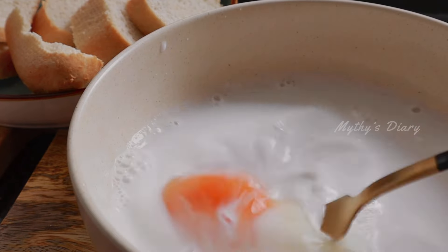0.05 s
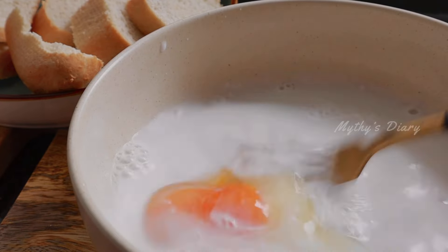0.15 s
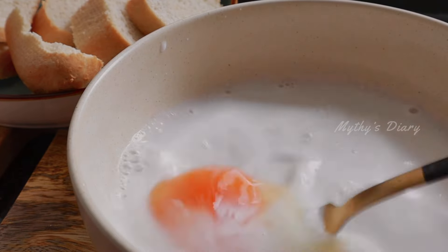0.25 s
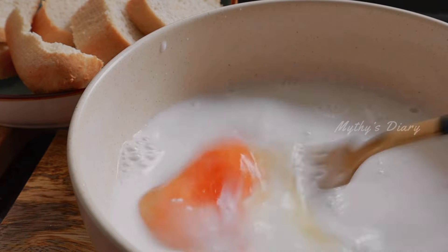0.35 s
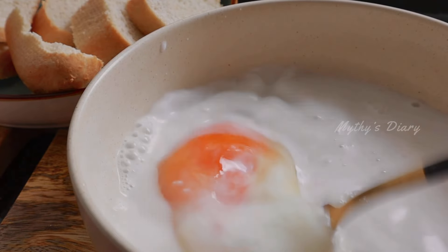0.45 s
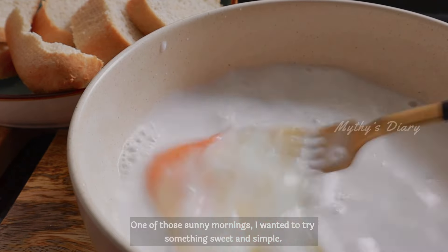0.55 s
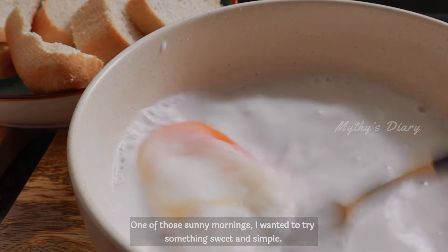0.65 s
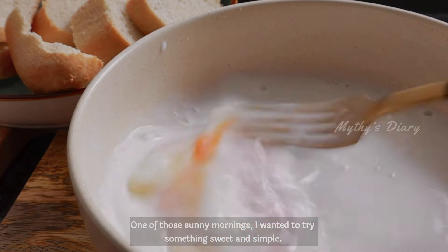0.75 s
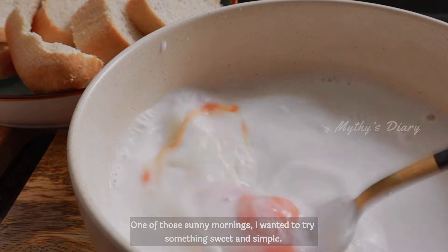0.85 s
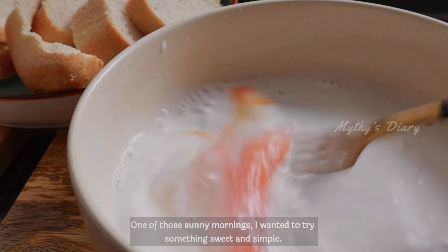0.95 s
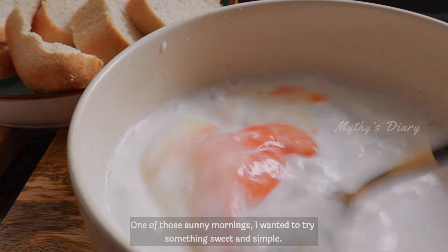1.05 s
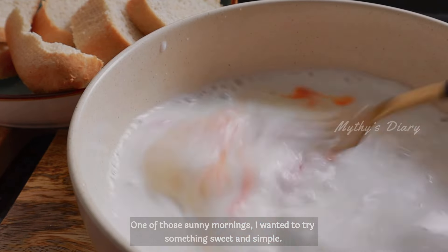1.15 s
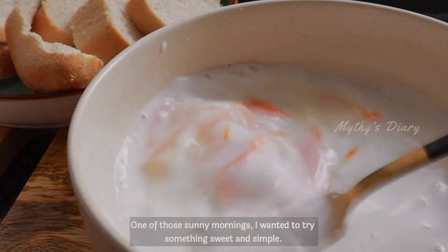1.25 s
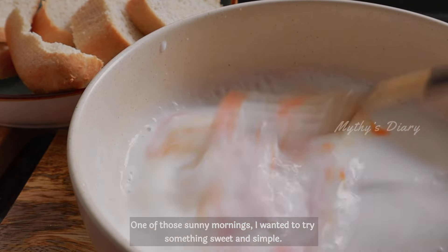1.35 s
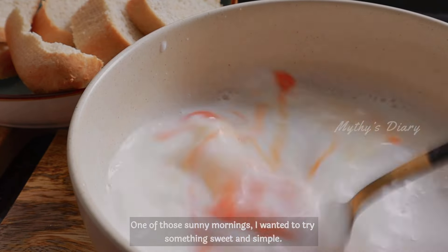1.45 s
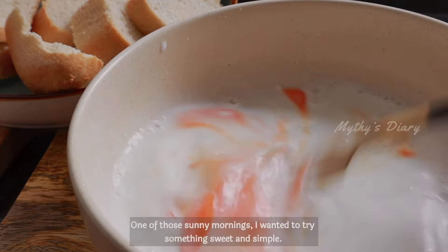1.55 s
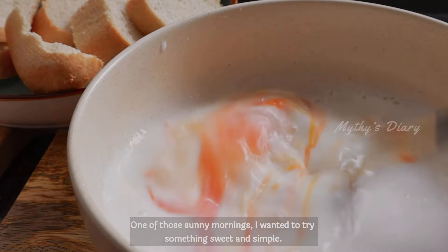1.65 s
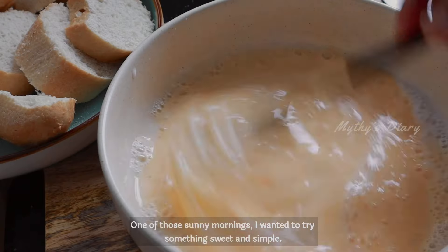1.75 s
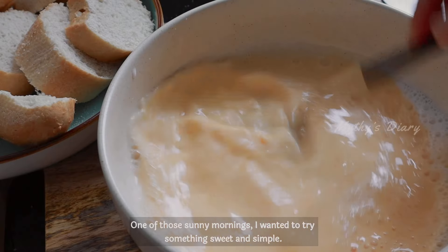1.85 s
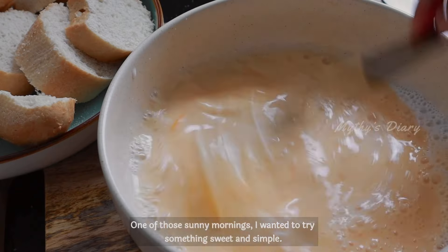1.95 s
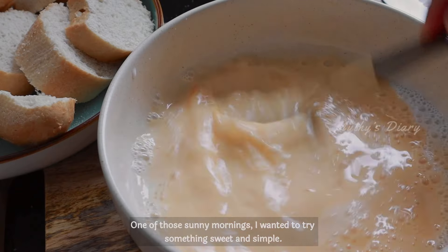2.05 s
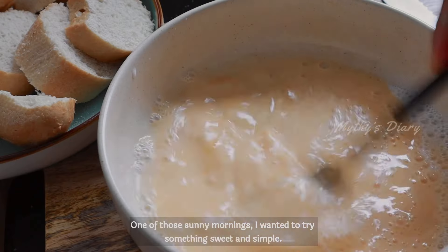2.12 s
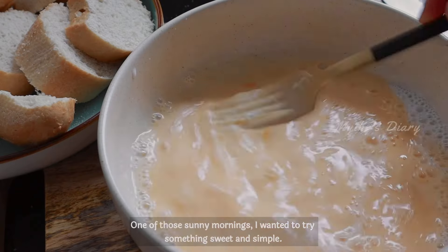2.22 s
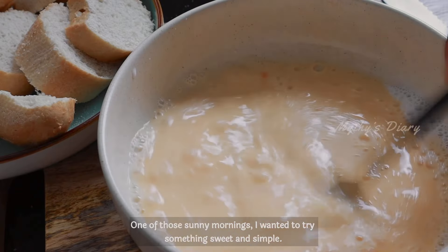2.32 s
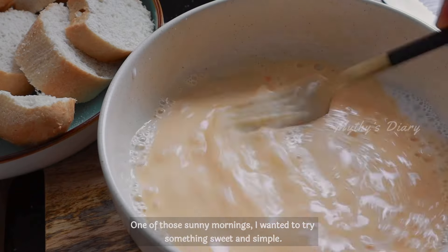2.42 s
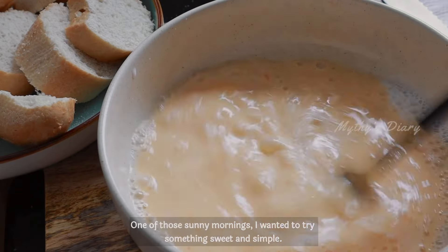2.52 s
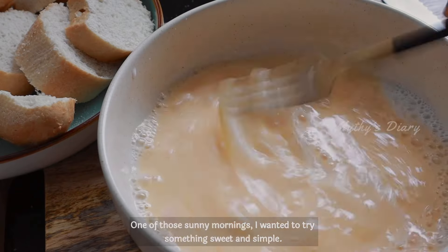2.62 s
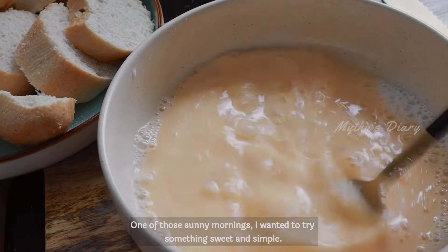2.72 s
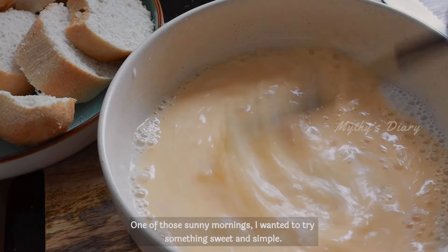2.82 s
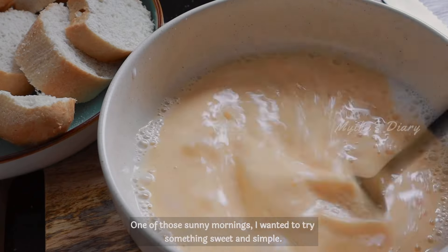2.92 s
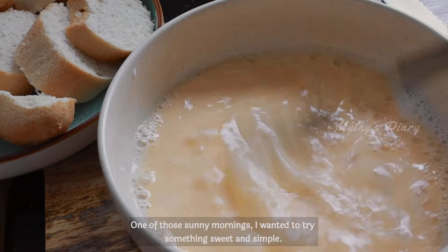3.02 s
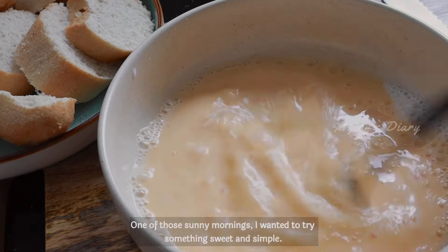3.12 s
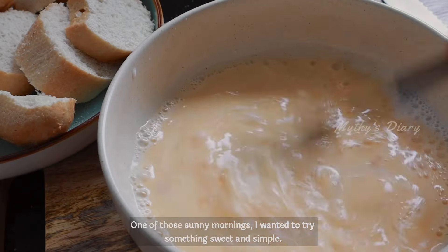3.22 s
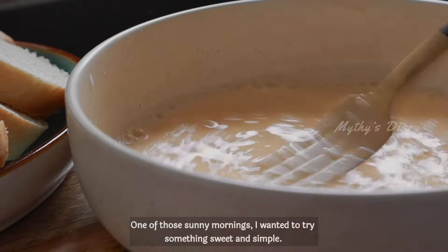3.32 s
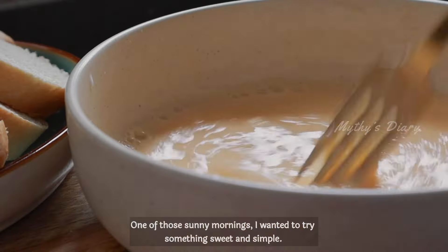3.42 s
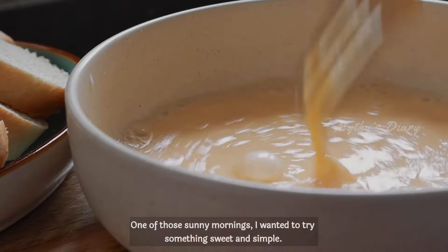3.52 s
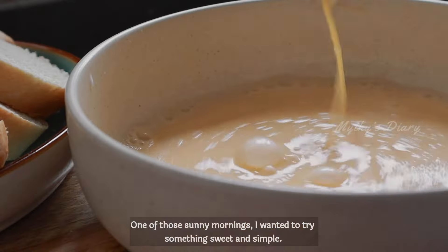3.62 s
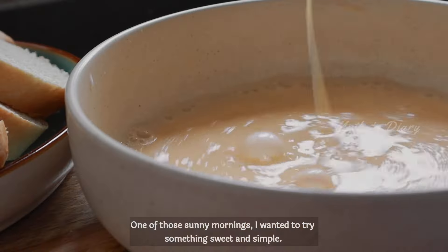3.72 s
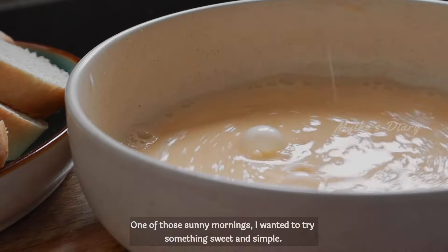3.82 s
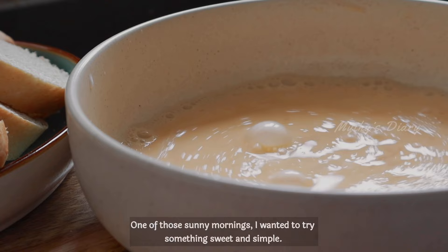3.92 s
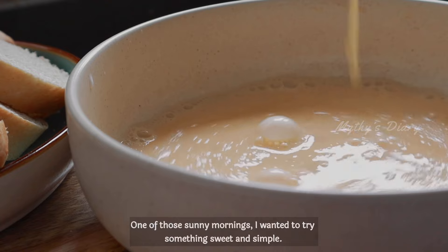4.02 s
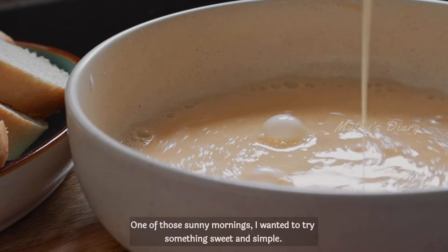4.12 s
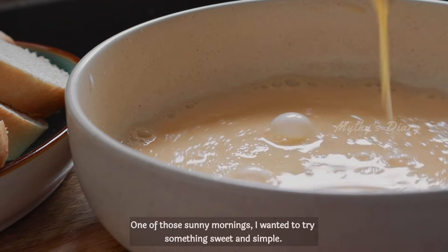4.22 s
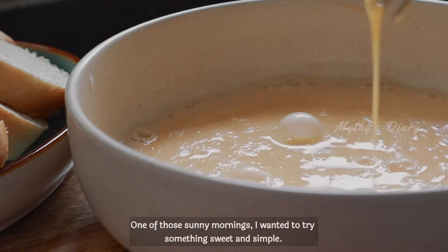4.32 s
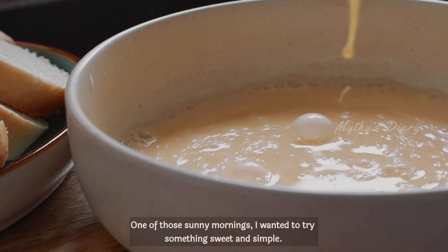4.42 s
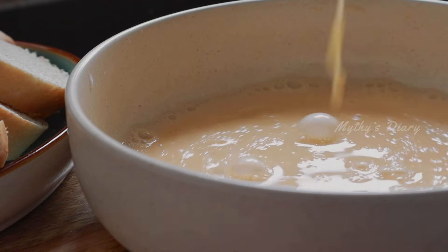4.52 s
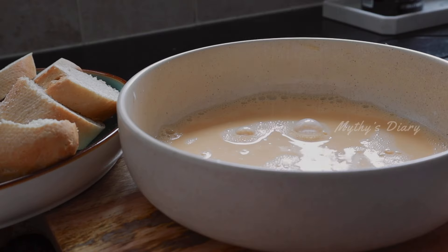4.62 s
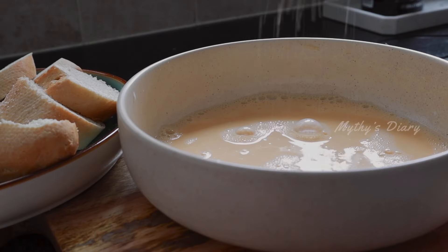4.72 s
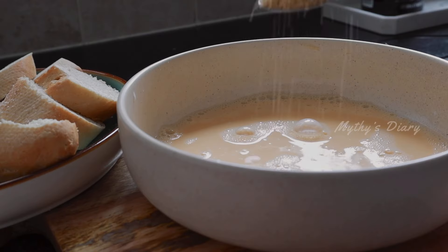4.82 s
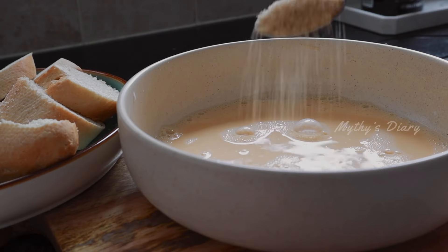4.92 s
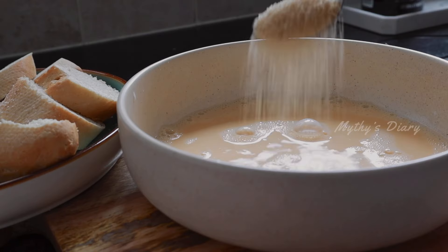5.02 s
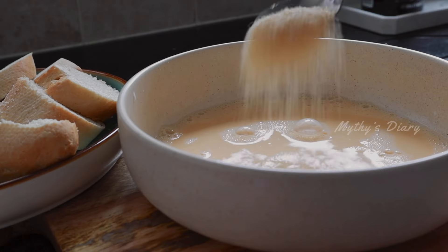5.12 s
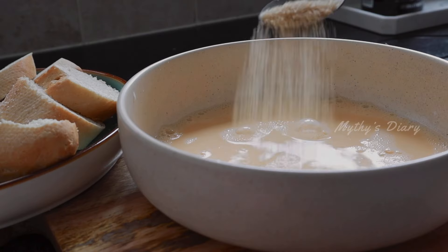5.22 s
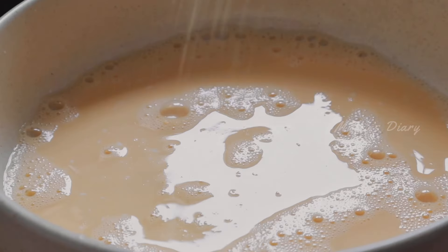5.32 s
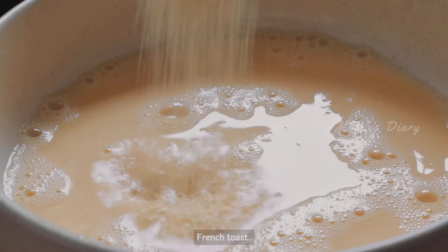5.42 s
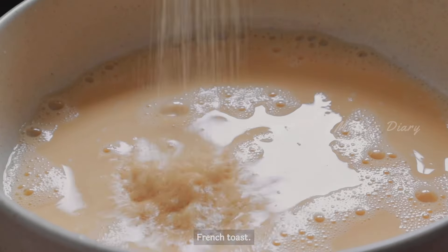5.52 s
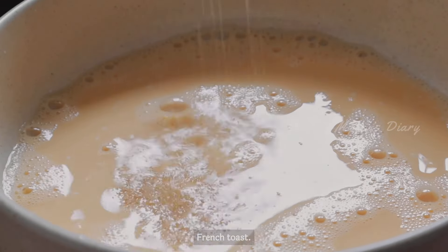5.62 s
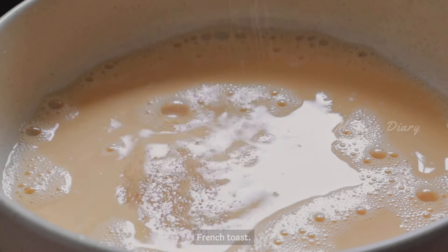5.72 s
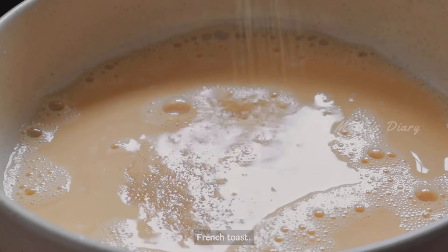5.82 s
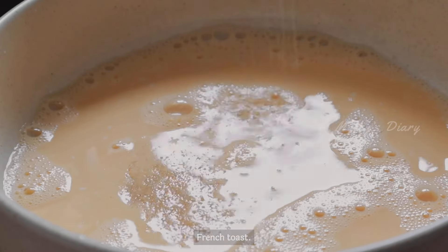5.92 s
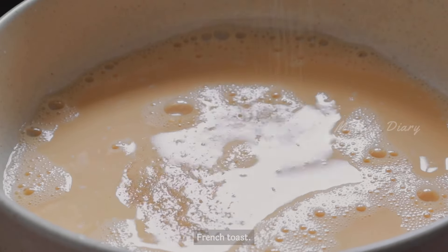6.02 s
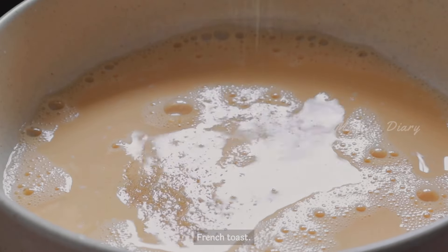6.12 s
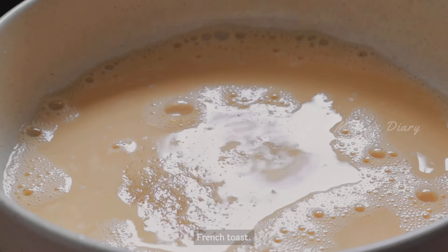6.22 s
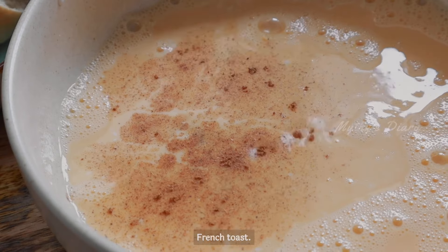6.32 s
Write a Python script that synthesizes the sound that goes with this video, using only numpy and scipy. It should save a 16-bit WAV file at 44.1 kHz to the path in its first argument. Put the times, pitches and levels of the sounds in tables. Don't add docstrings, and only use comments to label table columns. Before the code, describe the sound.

Close to the microphone in a small kitchen, a metal fork beats egg and milk in a ceramic bowl. Soft, uneven strokes become steady, louder clinks with short scrapes, tiny squeaks, gulps and droplets, the bowl thudding on its board. A light rim tap and two faint distant knocks follow in near quiet, then sugar ticks and rattles off a spoon in dry, grainy swells.

```python
import sys
import numpy as np
from scipy import signal
from scipy.fft import rfft, irfft, next_fast_len
from scipy.io import wavfile
from scipy.ndimage import uniform_filter1d, minimum_filter1d

SR = 44100
rng = np.random.default_rng(int(sys.argv[2]) if len(sys.argv) > 2 else 0)


def bounce(signal):
    frames = np.transpose(np.atleast_2d(signal))
    limited = np.clip(frames, -1, 1)
    pcm = np.round(limited * 32767).astype(np.int16)
    wavfile.write(sys.argv[1], SR, pcm)


def decibels_to_gain(level_db):
    exponent = np.asarray(level_db, float) / 20
    return 10 ** exponent


N = 280476


def unit(x):
    return x / np.sqrt(np.mean(x ** 2) + 1e-20)


def along(points, hz):
    f, v = np.transpose(points)
    return np.interp(np.log(hz + 1), np.log(f + 1), v)


def curves(rows, t):
    s, *cols = np.transpose(rows)
    return [np.interp(t, s, c) for c in cols]


def add(track, s, sound):
    part = track[round(s * SR):][:len(sound)]
    part += sound[:len(part)]


def equalized(x, spectrum):
    return irfft(rfft(x) * decibels_to_gain(along(spectrum, np.fft.rfftfreq(N, 1 / SR))), N)


def coloured(x, spectrum):
    m = next_fast_len(len(x) + 8192)
    gain = decibels_to_gain(along(spectrum, np.fft.rfftfreq(m, 1 / SR)))
    return unit(irfft(rfft(x, m) * gain, m)[:len(x)])


def above(x, hz):
    return signal.sosfilt(signal.butter(6, hz, "high", fs=SR, output="sos"), x)


def patchy(x, depth_db):
    z = signal.stft(x, nperseg=128)[2]
    field = uniform_filter1d(rng.standard_normal(z.shape), 3, 0)
    field = unit(uniform_filter1d(field, 6, 1))
    gain = decibels_to_gain(depth_db * field - depth_db ** 2 / 8.7)
    return signal.istft(z * gain, nperseg=128)[1][:len(x)]


def grit(size, rate, spread_db):
    chance, sign, rarity = rng.random((3, size))
    sizes = decibels_to_gain(-spread_db * np.log(rarity + 1e-4))
    return unit((chance < rate / SR) * np.sign(sign - .5) * sizes)


def ring(modes, scatter_db, cycles, lasting_db):
    t = np.arange(SR // 4) / SR
    hz, db = np.transpose(modes)[:, :, None]
    luck = rng.standard_normal((5, len(modes), 1))

    def wave(shift, turns):
        decay = decibels_to_gain(-60 * t * np.sqrt(hz * 4000) / turns)
        return decay * np.sin(2 * np.pi * hz * (1 + shift) * t)

    quick = decibels_to_gain(scatter_db * luck[0]) * wave(0.032 * luck[1], cycles)
    quick += 1.1 * decibels_to_gain(scatter_db * luck[2]) * wave(0.13 * luck[3], cycles / 3.1)
    quick += 0.42 * wave(0.1 * luck[4], cycles / 9)
    lasting = decibels_to_gain(lasting_db + scatter_db * luck[4]) * wave(0.0019 * luck[1], 880)
    attack = 1 - np.exp(-t / 0.00014)
    return (decibels_to_gain(db) * (quick + lasting)).sum(axis=0) * attack


# (frequency [Hz], level [dB])
BOWL_MODES = [(1540, -34.5), (1655, 22.5), (1820, -12), (2040, 18.5), (2200, 13), (2450, 19.5),
              (2810, 22.5), (3080, -9), (3350, 21)]
TINE_MODES = [(3800, -17), (4200, -7), (4720, 4), (5400, 11.5), (5630, 7.5), (6050, -18.5), (6300, 14),
              (6800, 0.5), (7150, 5.5)]
TIP_MODES = [(7700, 8), (8100, -14), (8470, 9), (8680, -18), (9400, -5), (10100, 0), (10900, 0.5),
             (12000, 3.5), (12800, 3.5), (13700, -0.5), (14600, -2.5), (15500, -0.5), (16600, -15)]


def strike(track, row, cycles, lasting_db):
    for modes, db in zip((BOWL_MODES, TINE_MODES, TIP_MODES), row[1:]):
        sound = ring(modes, 3, cycles, lasting_db)
        add(track, row[0], decibels_to_gain(db) * sound / np.std(sound[:SR // 330]))


CUTS = [
    1.717,
    3.35,
    4.58,
    5.33,
]
# (rumble [dB], hum [dB], hiss [dB])
SHOT_AIR = [
    (-70.5, -65.5, -65),
    (-68, -64, -59),
    (-71.5, -60.5, -60),
    (-64, -62, -59.5),
    (-63, -57.5, -58.5),
]
# (time [s], effort [dB])
EFFORT = [(0, 4), (1.12, 2), (1.18, 12), (1.7, -2), (1.74, -33), (1.9, 4.5), (1.96, 8), (3.2, -4), (3.5, 4),
          (4.5, -5)]
# (frequency [Hz], density [dB per Hz])
RUMBLE = [(12, -38.5), (20, -19.5), (48, -1), (81, -6.5), (100, 0), (130, -33.5), (220, -120)]
HUM = [(41, -35), (70, -11.5), (123, -3.5), (157, -9.5), (225, 0.5), (259, -9.5), (298, -7), (366, -13.5),
       (500, -16.5), (650, -45.5), (1100, -120)]
HISS = [(240, -34), (400, -16.5), (588, -4.5), (1870, -9), (16000, -17.5)]


def air():
    t = np.arange(N) / SR
    growth = (1.2, .4, .6)
    levels = np.transpose(SHOT_AIR)[:, np.searchsorted(CUTS, t)]
    levels = levels + np.outer(growth, curves(EFFORT, t)[0])
    layers = zip(levels, (RUMBLE, HUM, HISS))
    return sum(decibels_to_gain(db) * coloured(rng.standard_normal(N), spectrum) for db, spectrum in layers)


# (frequency [Hz], t60 [s])
KITCHEN_T60 = [(300, 0.879), (1500, 0.54), (6000, 0.4464), (10500, 0.3), (15000, 0.13)]
# (frequency [Hz], level [dB])
WASH = [(1200, 2.5), (2200, 4), (3700, -2), (5600, 3), (7300, 0), (8500, 0), (11000, 3.5), (15000, 4)]


def kitchen(x):
    out = np.zeros(N)
    cuts = [round(s * SR) for s in CUTS] + [N]
    edges = sorted({*range(0, N, SR // 11), *cuts})
    for start, stop in zip(edges, edges[1:]):
        hz, t, z = signal.stft(rng.standard_normal(SR // 2), SR, nperseg=256)
        decay = decibels_to_gain(-60 * t / along(KITCHEN_T60, hz)[:, None])
        tail = signal.istft(z * decay, SR, nperseg=256)[1]
        answer = signal.fftconvolve(x[start:stop], tail / np.linalg.norm(tail))
        shot_end = min(cut for cut in cuts if cut >= stop)
        add(out, start / SR + 0.002, answer[:shot_end - start])
    return equalized(out, WASH)


# (time [s], level [dB])
KNOCKS = [
    (3.7018, -39),
    (3.8913, -48.5),
]


def knocks():
    out, t = np.zeros(N), np.arange(SR // 50) / SR
    spectrum = [(300, -14), (1300, -4), (3000, -5), (14000, -21)]  # Hz, dB per Hz
    for s, db in KNOCKS:
        puff = coloured(rng.standard_normal(len(t)), spectrum)
        add(out, s, decibels_to_gain(db - 1.0 - 60 * t / 0.045) * puff)
    return out


# (time [s], pitch [Hz], rms level [dB])
ROCKING = [(1.0, 55.9, -71), (1.61, 55.8, -56.5), (1.76, 56.3, -85), (1.94, 53, -64.5), (2.3, 53.4, -63),
           (2.4, 50.67, -66), (2.56, 57.9, -64.5), (3.25, 56.9, -71), (3.4, 54.7, -95.5)]


def rocking():
    t = np.arange(N) / SR
    hz, db = curves(ROCKING, t)
    sway_db = 3 * np.interp(t, np.arange(100) / 14, rng.standard_normal(100))
    note = np.sin(2 * np.pi * np.cumsum(hz) / SR + sway_db / 2)
    return decibels_to_gain(db + 2.0 + sway_db) * (t > ROCKING[0][0]) * note


# (frequency [Hz], level [dB], t60 [s], growth [dB per dB of blow])
BOARD_MODES = [(157, -44.5, 0.36, 0.2), (263, -30.5, 0.059, 1.5), (362, -29.5, 0.15, 1.4)]


def thuds():
    out, t = np.zeros(N), np.arange(SR // 6) / SR
    push_s = .0012
    for s, blow_db, *_ in STROKES:
        sound = decibels_to_gain(-19 + 1.6 * blow_db) * (1 - t / push_s) * np.exp(-t / push_s) * (1 - np.exp(-t / 0.0006))
        for hz, db, t60, grows in BOARD_MODES:
            luck = rng.standard_normal()
            level = decibels_to_gain(db + grows * blow_db + 2 * luck - 60 * t / t60)
            tone = np.sin(2 * np.pi * hz * (1 + luck / 30) * t)
            sound += level * tone * (1 - np.exp(-t / t60 * 20))
        add(out, s, sound)
    return out


# (time [s], peak level [dB], low share [dB], high share [dB])
TICKS = [(4.711, -15, -9, -19), (4.7157, -17, -31.5, -13), (4.9282, -31, -10, -15), (4.946, -37, -14.5, -9),
         (4.9746, -37, -17.5, -16), (5.086, -37, -31.5, -6.5), (5.1162, -30, -28, -17),
         (5.1946, -25.5, -26, -29), (5.3131, -28, -31.5, -38), (5.5086, -35, -17, -0.5),
         (5.94, -32, -17.5, -3.5), (6.0137, -41, -19, -0.5), (6.021, -42, -37, 3.5),
         (6.113, -34.5, -18.5, -14), (5.502, -42, -20, -5), (5.576, -38, -14.5, -8), (5.728, -43, -22, -1),
         (5.768, -48, -25, -5), (5.954, -46, -28, -2), (5.977, -47, -28, -1), (6.125, -46.5, -28, -3)]
# (crest time [s], fall [s], flow level [dB], brightness [dB])
POUR = [(4.738, 0.054, -47, -2.5), (4.976, 0.013, -55, 0), (5.109, 0.0184, -52.5, -1),
        (5.198, 0.0125, -54.5, 3), (5.226, 0.013, -47.5, -2), (5.25, 0.028, -50.5, -2),
        (5.529, 0.053, -47.5, 1.5), (5.632, 0.021, -41, 1), (5.7, 0.027, -56.5, 3),
        (5.825, 0.01, -68.5, 13), (5.94, 0.014, -53.5, 3.5), (6.021, 0.017, -54, 6), (6.12, 0.0303, -67, 0)]
# (frequency [Hz], density [dB per Hz])
CRYSTAL_LOW = [(1400, -21), (2400, -3.5), (3100, -7.5), (3450, -1), (4000, -6.5), (4650, 4), (5100, -1.5),
               (6800, -1.5), (9000, -11.5)]
CRYSTAL_HIGH = [(3530, -45.5), (6000, -7), (8330, 6.5), (10400, -9), (12700, -2.5), (14900, -7),
                (16000, -8)]


def sugar():
    out, t = np.zeros(N), np.arange(N) / SR
    rise_s = 0.013
    for s, db, low_db, high_db in TICKS:
        row = (s, db + low_db + 0.5, db - 18.5, db + high_db - 3.0)
        strike(out, row, cycles=33.0, lasting_db=-60)
    for tilt, spectrum in ((-1.47, CRYSTAL_LOW), (0.78, CRYSTAL_HIGH)):
        flow = np.zeros(N)
        for s, fall_s, db, bright_db in POUR:
            swell = np.exp(-np.abs(t - s) / np.where(t < s, rise_s, fall_s))
            flow += decibels_to_gain(db + tilt * bright_db) * swell
        out += flow * coloured(grit(N, rate=4000, spread_db=2.2), spectrum)
    return above(out, 2750)


# (time [s], peak level [dB], pitch [Hz])
DROPS = [(0.0442, -40.5, 7040), (1.706, -37.5, 2200), (0.279, -28, 3097), (.73, -38.5, 4200),
         (.749, -41.5, 2700), (0.78, -40.5, 1870), (.808, -37, 7400), (0.819, -31.5, 4680),
         (.838, -36, 8350), (0.8498, -36.5, 3040), (.969, -27, 4130), (1.061, -34.5, 2737),
         (1.089, -25, 2960), (1.112, -31, 5220), (1.422, -39, 2680), (1.4327, -36, 4600),
         (1.441, -34, 8260), (1.4505, -30, 4284), (1.457, -38, 3410), (1.5136, -33, 1730),
         (1.5225, -23, 3530), (2.313, -35.5, 8030), (2.339, -32.5, 3080), (2.4556, -16, 2700),
         (0.655, -33, 11500), (2.473, -30.5, 4120), (2.633, -27.5, 2900), (3.276, -31.5, 3590),
         (1.161, -27, 2400), (1.5136, -34, 2830), (2.635, -35, 3800), (3.248, -24, 3030),
         (3.497, -43, 5270), (1.6104, -24, 2810), (1.608, -13, 8140), (1.185, -36.5, 1440)]


def drops():
    out, t = np.zeros(N), np.arange(SR // 30) / SR
    for s, db, hz in DROPS:
        note = np.sin(2 * np.pi * hz * t * (1 + 2 * t))
        note *= np.exp(-t * hz / 6) * (1 - np.exp(-t / 0.00018))
        click = .12 * decibels_to_gain(-60 * t / 0.003) * rng.standard_normal(len(t))
        add(out, s, decibels_to_gain(db + 3.0) * (note + click))
    return out


def slosh():
    out, t = np.zeros(N), np.arange(SR // 40) / SR
    for when, pitch, size in rng.random((200, 3)):
        hz = 1900 * 4 ** pitch
        db = -5 * np.log(size + 1e-2) - 53.5
        note = np.sin(2 * np.pi * hz * t * (1 + 5 * t))
        envelope = np.exp(-t * hz / 3.9) * (1 - np.exp(-t / 0.00027))
        add(out, .6 + 2.7 * when, decibels_to_gain(db) * note * envelope)
    return out


# (time [s], peak level [dB], pitch [Hz], t60 [s], glide [share of pitch per half second])
GULPS = [(0.969, -37, 1144, 0.0223, 0), (0.985, -24.5, 845.6, 0.043, 3), (3.1, -50.5, 626, 0.25, 8),
         (1.583, -40.5, 942, 0.053, -5), (1.605, -40, 870.3, 0.064, -4.5), (2.006, -26.5, 1055, 0.019, 8),
         (2.182, -25.5, 928.4, 0.028, 1), (2.204, -29, 820, 0.035, 4), (2.416, -32, 800, 0.09, -0.2),
         (2.428, -34.5, 927, 0.15, 1.5), (2.454, -33.5, 745, 0.081, 1), (2.601, -26.5, 1049, 0.04, 5),
         (2.63, -30, 660, 0.12, 0.1), (2.795, -25, 1127, 0.0505, 3.5), (2.903, -28, 846.6, 0.071, 2.5),
         (3.081, -38, 506.3, 0.052, 8.5), (2.23, -34.5, 1418, 0.036, 2.5), (3.3, -45.5, 993.3, 0.053, -1),
         (1.576, -44.5, 1000, 0.036, -5.5), (1.607, -37, 1410, 0.063, -1.5),
         (2.906, -38.5, 1116, 0.054, 6.5), (2.64, -40, 999, 0.056, 2), (2.857, -44, 1145, 0.089, -3),
         (2.925, -47, 898, 0.18, -1), (3.335, -38.5, 1699, 0.0476, 4)]


def gulps():
    out, t = np.zeros(N), np.arange(SR // 8) / SR
    for s, db, hz, t60, glide in GULPS:
        tremble = .8 * unit(uniform_filter1d(rng.standard_normal(len(t)), SR // 150))
        tone = np.sin(2 * np.pi * hz * (t + glide * t * t) + tremble)
        tone *= decibels_to_gain(-60 * t / t60) * (1 - np.exp(-t / 0.00086))
        smack = .08 * decibels_to_gain(-60 * t / 0.016) * rng.standard_normal(len(t))
        add(out, s, decibels_to_gain(db + 3.0) * (tone + smack))
    return out


# (time
# [s], pitch [Hz], level [dB], half length [s], glide [share of pitch per s])
SQUEAKS = [(0.1339, 7030, -22.5, 0.0034, 9), (0.1659, 6680, -19.5, 0.0067, -2.5),
           (0.322, 5440, -25.5, 0.0038, 0.23), (0.3505, 7390, -28, 0.0063, -1),
           (0.3624, 6150, -20, 0.0018, 6), (0.5116, 5313, -20.5, 0.0015, 1.57),
           (0.892, 6600, -39, 0.006, 6.5), (0.5318, 10890, -28.5, 0.0023, -1.4),
           (0.9301, 8396, -10, 0.0019, -1), (0.9441, 8360, -19.5, 0.003, 3), (1.1357, 7364, -26, 0.0039, 6),
           (1.1364, 8520, -27.5, 0.00765, 0.73), (1.1432, 5513, -29.5, 0.00266, 0),
           (1.3355, 8520.0, -27, 0.0037, -0.5), (1.3449, 6322, -23.5, 0.0058, -4),
           (1.3487, 5370.0, -27.5, 0.0024, 2), (3.496, 8750, -39, 0.0062, 3),
           (1.5442, 6353, -25, 0.0024, -8), (1.9508, 8170, -25, 0.0022, 7.5),
           (1.9536, 4500, -18, 0.0032, 0.5), (1.9842, 6080, -33.5, 0.004, 7),
           (2.3502, 6646, -14.5, 0.0012, 2.5), (2.3591, 8380, -23, 0.0013, -3),
           (2.3694, 8720, -21.5, 0.0032, -1.8), (2.3841, 9440, -26, 0.0045, -2),
           (2.5836, 8153, -22.5, 0.0062, -1), (2.5954, 6110, -31, 0.0048, -4.5),
           (2.7762, 8170, -15, 0.0033, -5), (2.7842, 6174, -16, 0.0028, -3),
           (2.7842, 8390.0, -17, 0.002, 8.5), (2.8076, 8600, -22, 0.0045, -2),
           (2.9867, 4170, -17.5, 0.0015, -1.5), (2.9942, 5680.0, -18.5, 0.0026, 2),
           (2.9989, 8440, -23, 0.0096, 2.9), (2.9999, 6940, -14.5, 0.0028, 0),
           (3.1947, 5410.0, -15.5, 0.0012, 4), (3.1952, 6580, -14.5, 0.0015, 7.5),
           (3.2322, 8258, -23, 0.0072, 1.4),
           (0.1389, 2420.0, -35.5, 0.0064, -2.5), (0.1567, 2392, -33, 0.0062, -2.5),
          (0.3467, 2034, -32.5, 0.0101, 3), (0.4976, 2016, -28, 0.00192, 5),
          (0.9217, 2117, -25.5, 0.00717, 19), (1.148, 2071, -30.5, 0.004, 2), (3.497, 2400, -35, 0.008, -3),
          (1.5422, 3433, -25, 0.0047, 2.5), (1.5585, 2048, -33, 0.0031, 0.5),
          (1.9564, 2853, -15.5, 0.0036, -4), (1.353, 2150, -35.5, 0.0088, -3),
          (2.1519, 2858, -23, 0.0032, 2.5), (2.1522, 2088, -21, 0.0055, 1.5),
          (2.1761, 2104, -27.5, 0.003, 25.3), (2.1984, 3077, -32, 0.0037, -1.2),
          (2.3532, 2783, -21.5, 0.0029, -4.5), (2.3603, 2238, -24, 0.0032, 2.5),
          (2.3751, 1715, -26.5, 0.0016, 6), (2.438, 2026, -34.5, 0.0072, 4),
          (2.5581, 2748, -20.5, 0.0036, 7.5), (2.5613, 2073, -22.5, 0.00545, 12.5),
          (2.5924, 1943, -28.5, 0.0107, -6), (2.6144, 2000, -22.5, 0.00575, 3.5),
          (2.7777, 2500, -18.5, 0.0073, -6.5), (2.7781, 3633, -23, 0.00244, -5.5),
          (2.7822, 1640, -18.5, 0.0052, -0.5), (2.8219, 2059, -19, 0.00446, -4),
          (2.9947, 2896, -19.5, 0.0041, 9), (3.0102, 1687, -23.5, 0.00228, -16),
          (3.0342, 2088, -20.5, 0.0051, -12.5), (3.094, 1880.0, -35, 0.00166, -3.5),
          (3.1986, 2781, -15, 0.00425, -1.5), (3.208, 2093, -24.5, 0.0032, 7.5),
          (3.2142, 1527, -22, 0.00624, -8.5), (3.2507, 2004, -27.5, 0.00513, -5),
          (3.4609, 2767, -22, 0.0026, -17), (3.4716, 2182, -31.5, 0.0157, 1.5)]


def squeaks():
    out, t = np.zeros(N), np.arange(-SR // 30, SR // 30) / SR
    for s, hz, db, half_s, glide in SQUEAKS:
        phase = 2 * np.pi * rng.random()
        flutter = decibels_to_gain(5.4 * np.sin(2 * np.pi * 170 * t + phase))
        width = np.abs(half_s) * np.where(t < 0, 1.05, 1.4) + 1e-4
        swell = np.exp(-(t / width) ** 2)
        tone = np.sin(2 * np.pi * hz * (t + glide * t * t / 2))
        add(out, s + t[0], decibels_to_gain(db + 0.76) * swell * flutter * tone)
    return out


def groups(db, bright_db):
    return db - 1.5 - bright_db, db, db - 2 + bright_db


# (time [s], blow level [dB], brightness [dB], lead-in tick level [dB], rebound level [dB])
STROKES = [(0.11, -31.5, 3, -55, -59.5), (0.3109, -22, 3, -70, -31), (0.5104, -18, 1.5, -35.5, -46.5),
           (0.6675, -28, -8, -67, -104), (0.922, -12, 6, -50, -41.5), (1.1266, -27, 7, -58, -29),
           (1.5376, -23, 1.5, -58.5, -40), (1.953, -16, 2, -24, -27), (2.1461, -11, 0, -33, -37),
           (2.3484, -10.5, 2.5, -40.5, -23), (2.5544, -16, -1.5, -35.5, -36.5),
           (2.775, -10, -3, -59.5, -15), (2.9855, -15.5, -2.5, -42.5, -13.5),
           (3.1928, -11.5, 0, -35.5, -27.5), (3.4561, -24, -4, -52, -31)]
# (time [s], level [dB], brightness [dB])
TOUCHES = [(2.7672, -22.5, -4), (0.1492, -29, 5.5), (0.491, -30.5, -0.5), (.886, -40, 0.5), (0.9088, -37, 3.5),
           (0.93, -25, 5.5), (1.079, -39, 15.5), (1.276, -48.5, 21), (1.327, -33.5, -4), (0.543, -27.5, 2.5),
           (1.5248, -40, -11), (1.5288, -30.5, -10.5), (1.531, -24.5, 7), (1.9449, -26.5, 2.5),
           (2.5467, -28.5, 5.5), (2.6068, -33, -8.5), (3.201, -22, 0), (3.2064, -24, -0.5), (1.5561, -34, 11),
           (1.609, -33.5, 4), (1.9691, -26, -6.5), (1.981, -24.5, -0.5), (2.2156, -32.5, 7.5),
           (2.4306, -29, -1.5), (2.8068, -34, 5.5), (2.9726, -33.5, 1.5),
           (1.668, -56, 2), (0.655, -52, -4), (0.7795, -49, -6.5), (0.833, -45, -6), (1.0978, -44, 5),
          (1.285, -47, 9), (1.4515, -49, -4), (1.5006, -43.5, -1), (3.451, -38, -6), (2.539, -38, -3),
          (2.909, -43.5, -13.5)]


def contacts():
    lead_s, rebound_s = 0.01, .0068
    touches = TOUCHES
    for s, db, bright_db, lead_db, rebound_db in STROKES:
        touches.append((s - lead_s, lead_db, bright_db - 3))
        touches.append((s, db, bright_db))
        touches.append((s + rebound_s, rebound_db, bright_db))
    return [(s, *groups(db, bright_db)) for s, db, bright_db in touches]


# (time [s], bowl level [dB], tines level [dB], tips level [dB])
EARLIER_BLOW = [
    (1.72, -22, -22, -27),
]
RIM_TAP = [
    (3.4562, -30, -33, -37),
]


def blows():
    out = np.zeros(N)
    for row in contacts():
        strike(out, row, cycles=44, lasting_db=-49)
    strike(out, EARLIER_BLOW[0], cycles=160, lasting_db=-31)
    strike(out, RIM_TAP[0], cycles=160, lasting_db=-18)
    return out


# (start time [s], length [s], pressure level [dB], change over the stroke [dB], brightness [dB])
SCRAPES = [(0.106, 0.0324, -34.5, -1, 5.5), (0.128, 0.067, -28, 2.5, 7.5), (0.308, 0.066, -25, 5, 5.5),
           (0.487, 0.021, -31.5, 0, -2), (0.507, 0.055, -25, 0.5, 1.5), (0.667, 0.018, -36, -22, -9.5),
           (0.81, 0.048, -49.5, -10, -8), (0.916, 0.043, -23, -4.5, 5), (1.08, 0.0218, -33, 3, -4),
           (1.124, 0.047, -27.5, -2, 0.5), (1.3234, 0.046, -26.5, 0.5, 10.5), (1.534, 0.029, -24, 4, 9.5),
           (1.749, 0.032, -41, 3, 7), (1.942, 0.057, -21.5, -11.5, -0.5), (2.139, .083, -22, -19.5, 2),
           (2.351, 0.0747, -24, -6.5, -0.5), (2.546, 0.079, -23, -7, 2.5), (2.769, 0.064, -24, -16.5, -0.5),
           (2.979, 0.068, -21.5, -8.5, 0), (3.191, 0.0673, -24.5, -17.5, 0.5), (3.456, 0.052, -36, -4, -3)]


def scrapes():
    push, scraping = np.zeros((2, N))
    for s, length, db, change_db, bright_db in SCRAPES:
        t = np.arange(0, length, 1 / SR)
        progress = t / length - .5
        levels = groups(db + change_db * progress, bright_db + 6 * progress)
        add(push, s, decibels_to_gain(levels[0]))
        lift = np.clip(np.minimum((length - t) / 0.011, t / 0.0052), 0, 1)
        for modes, level, cycles in zip((BOWL_MODES, TINE_MODES, TIP_MODES), levels, (32, 27, 17)):
            hops = decibels_to_gain(2.2 * unit(uniform_filter1d(rng.standard_normal(len(t)), SR // 400)))
            chatter = unit(hops * grit(len(t), rate=5000, spread_db=1.8))
            sound = ring(modes, 3, cycles, -50)
            drive = chatter * lift * decibels_to_gain(level - 5.0)
            add(scraping, s, signal.fftconvolve(drive, sound / np.linalg.norm(sound)))
    return scraping, push


# (frequency [Hz], density [dB per Hz])
SPLASH = [(60, -39.5), (150, 0), (350, -2.5), (600, -12.5), (1100, -3.5), (1600, -27)]


def fork():
    scraping, push = scrapes()
    shove = decibels_to_gain(-24.5) * uniform_filter1d(push, SR // 60) * coloured(rng.standard_normal(N), SPLASH)
    return above(blows() + patchy(scraping, depth_db=4), 1697) + shove


def scene():
    beating, sprinkle, far, song = fork(), sugar(), knocks(), squeaks()
    wet = gulps() + slosh() + drops()
    sent = decibels_to_gain(-14.0) * beating + decibels_to_gain(-19) * wet + decibels_to_gain(-22) * song
    sent += decibels_to_gain(-13.5) * sprinkle + decibels_to_gain(-0.5) * far
    room = patchy(kitchen(sent), depth_db=2.5)
    return (beating + song + wet + thuds() + rocking() + sprinkle + far + room + air())[None]


# (sound stops [s], fade-out [s], gain reached [0-1], gap [s], fade-in [s])
FADES = [
    (1.716, .055, .5, .021, .055),
    (3.344, .084, .5, .018, .118),
    (4.57, .138, .01, .033, .147),
    (5.318, .098, .3, .027, .135),
    (6.315, .125, .12, .1, .1),
]


def fades():
    points, gap_gain = [], .002
    for s, fade_out, gain, gap, fade_in in FADES:
        points += [(s - fade_out, 1), (s, gain), (s + 1 / 500, gap_gain)]
        points += [(s + gap, gap_gain), (s + gap + fade_in, 1)]
    return curves(points, np.arange(N) / SR)[0]


def low_pass(x):
    return signal.sosfilt(signal.butter(12, 17140, fs=SR, output="sos"), x)


def record(dry):
    x = equalized(dry * fades(), [(15500, -0.5), (15900, -24.0), (17000, -27.5), (17300, -120)])
    needed = minimum_filter1d(.98 / np.maximum(np.abs(x), .98), 89)
    mix = x * uniform_filter1d(needed, 45)
    return low_pass(mix)


dry = scene()
out = record(dry)
bounce(out)
```